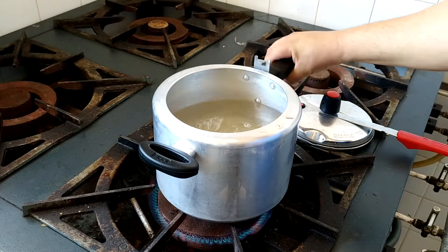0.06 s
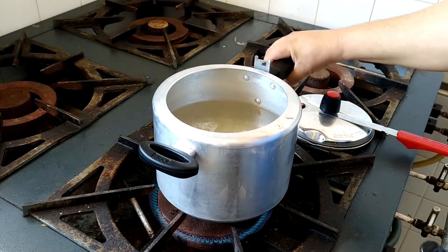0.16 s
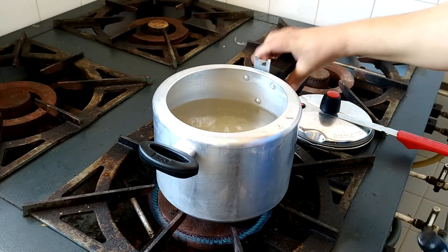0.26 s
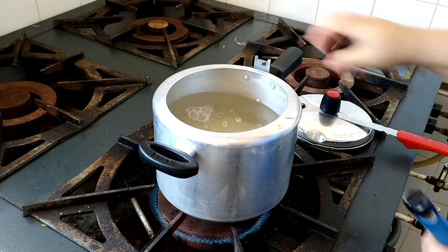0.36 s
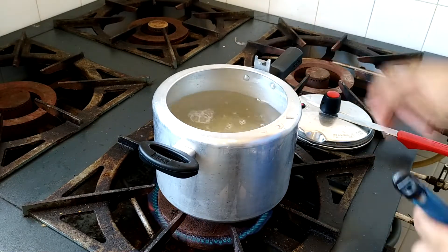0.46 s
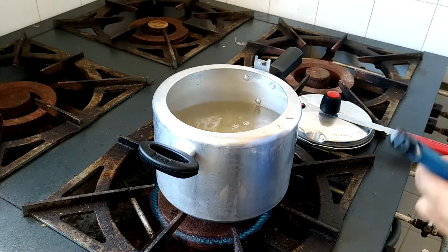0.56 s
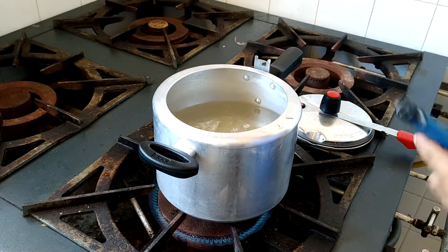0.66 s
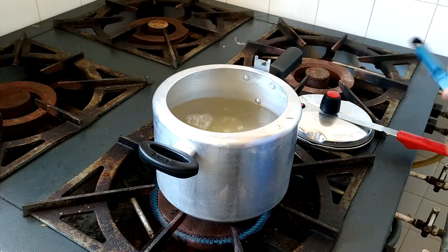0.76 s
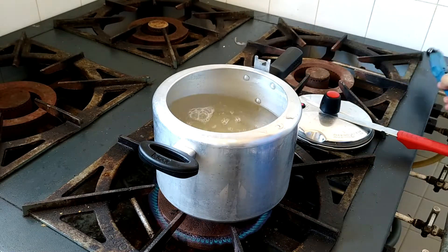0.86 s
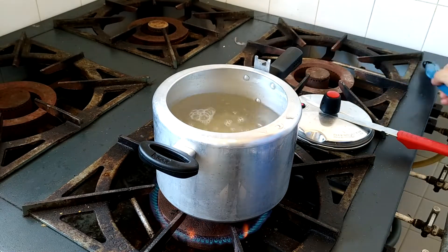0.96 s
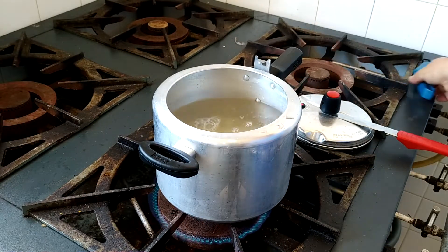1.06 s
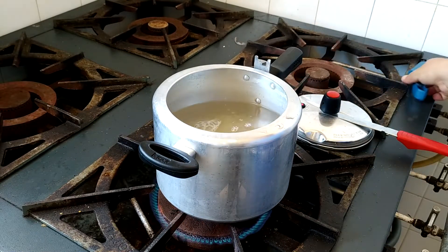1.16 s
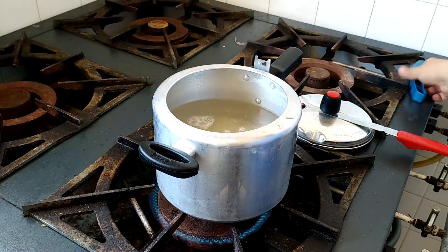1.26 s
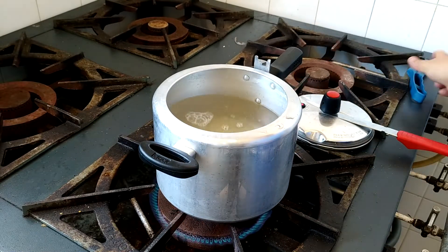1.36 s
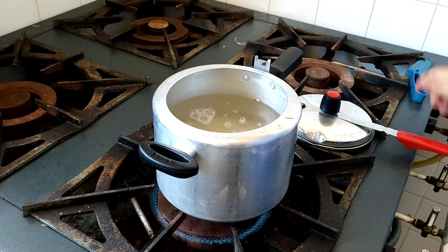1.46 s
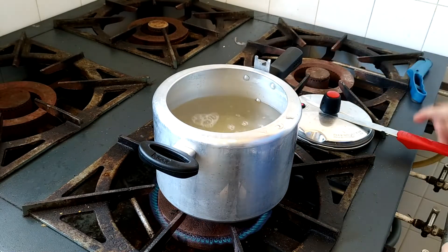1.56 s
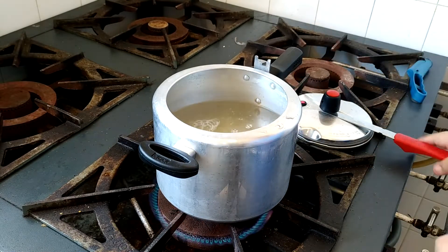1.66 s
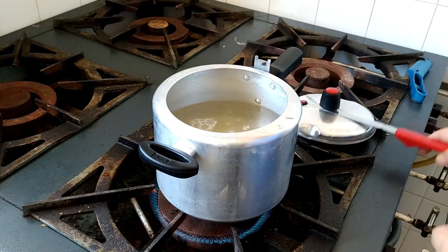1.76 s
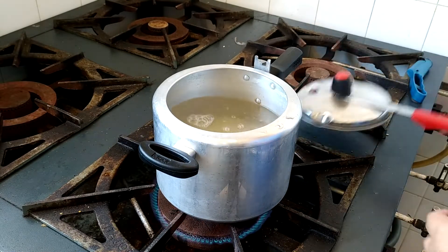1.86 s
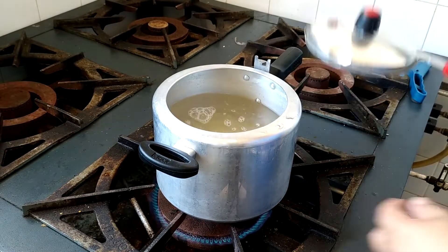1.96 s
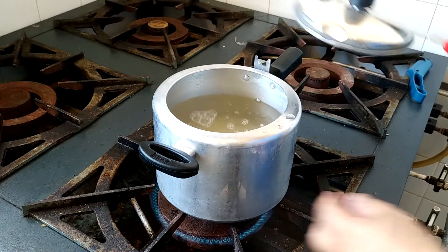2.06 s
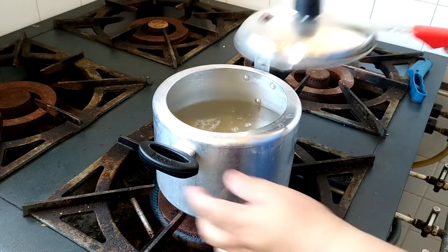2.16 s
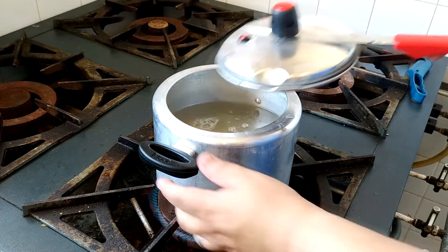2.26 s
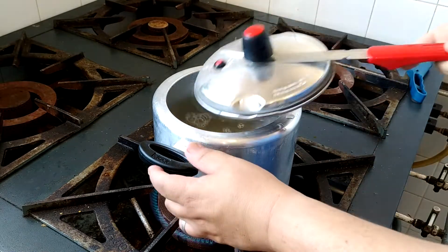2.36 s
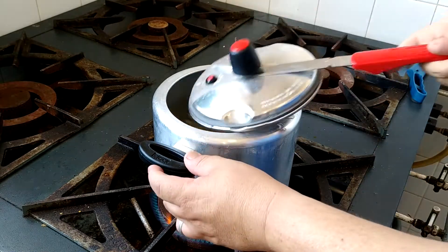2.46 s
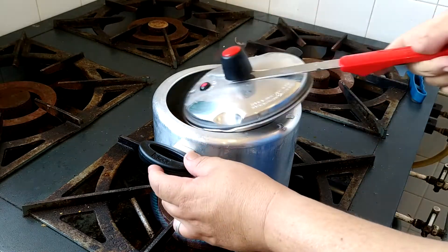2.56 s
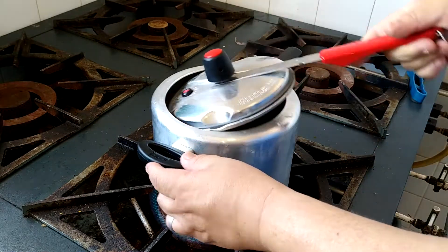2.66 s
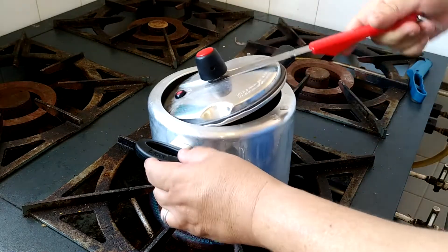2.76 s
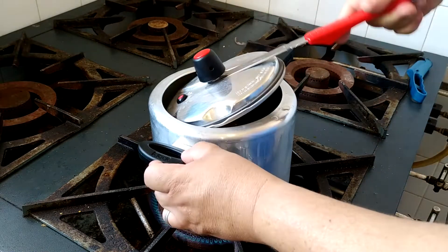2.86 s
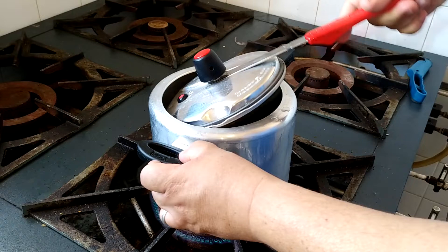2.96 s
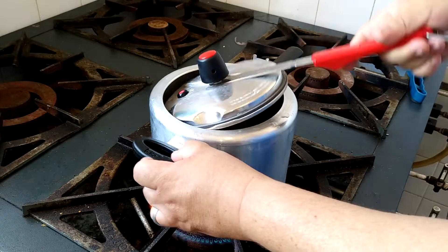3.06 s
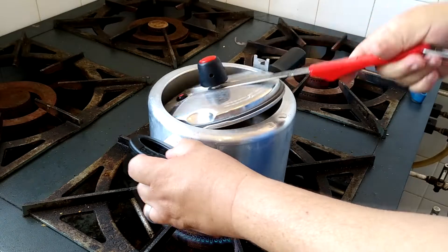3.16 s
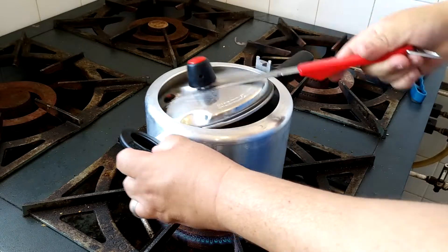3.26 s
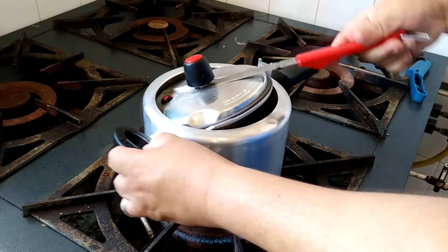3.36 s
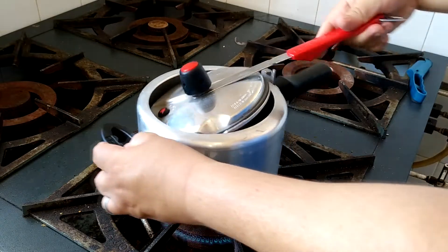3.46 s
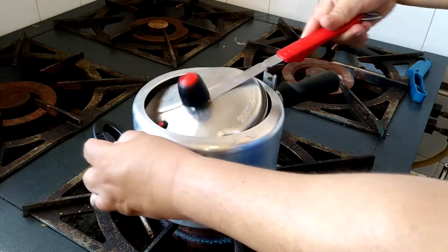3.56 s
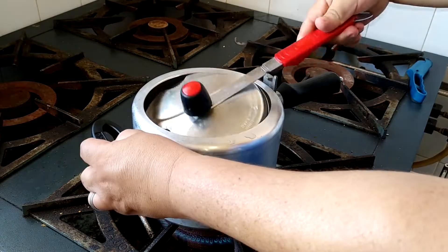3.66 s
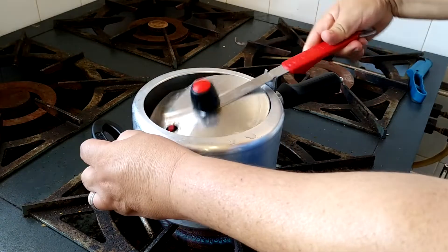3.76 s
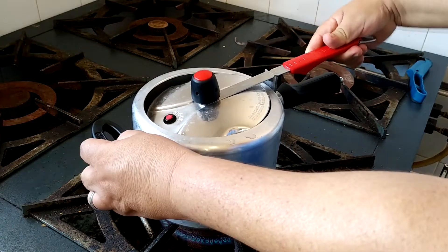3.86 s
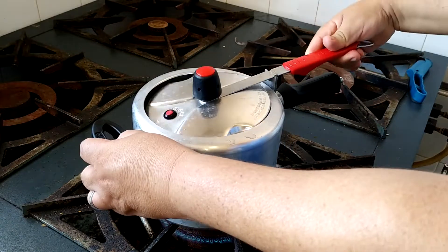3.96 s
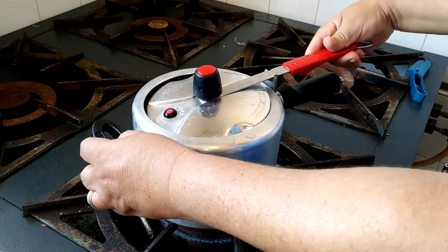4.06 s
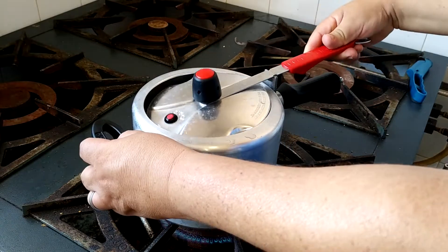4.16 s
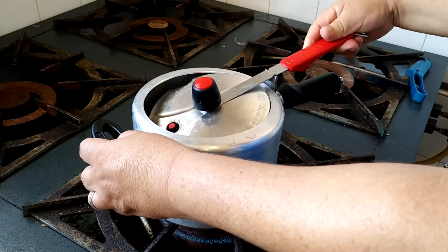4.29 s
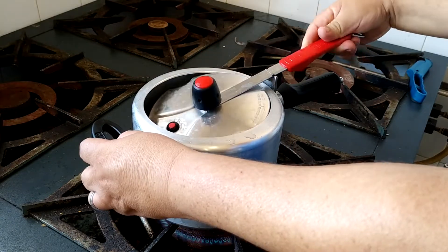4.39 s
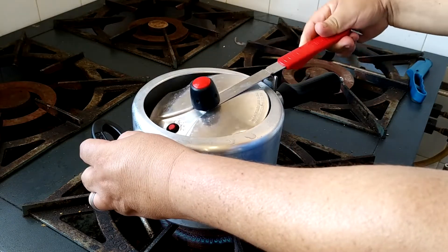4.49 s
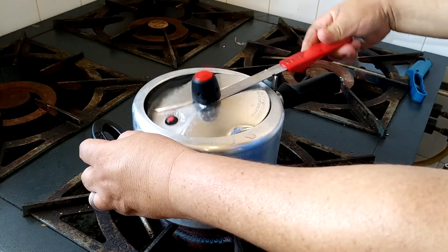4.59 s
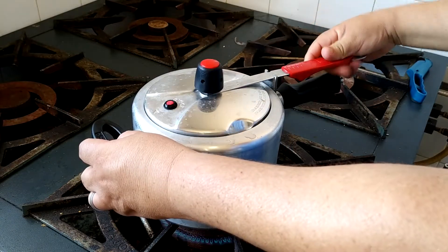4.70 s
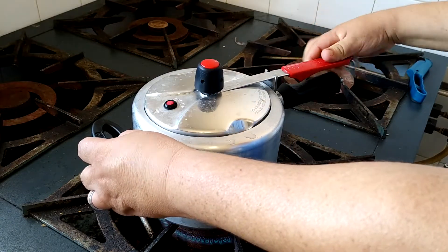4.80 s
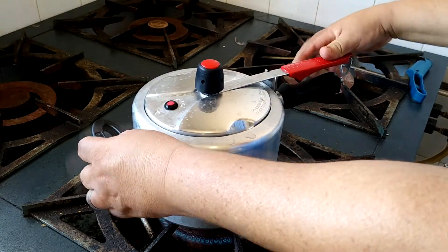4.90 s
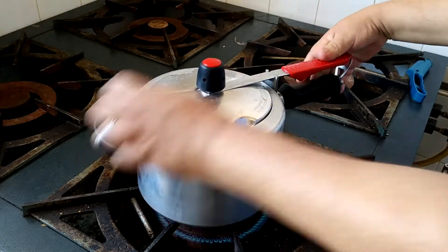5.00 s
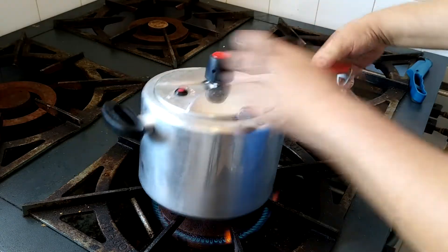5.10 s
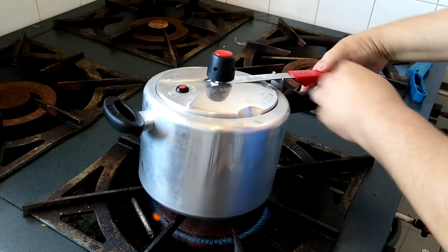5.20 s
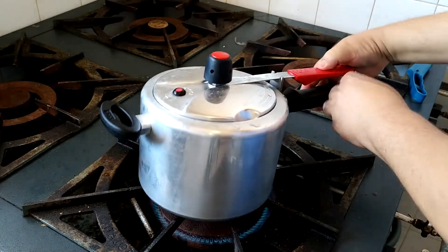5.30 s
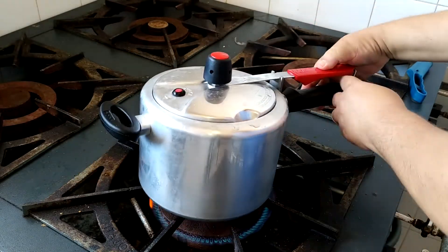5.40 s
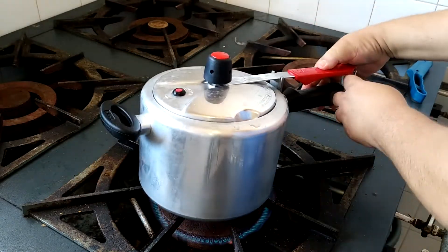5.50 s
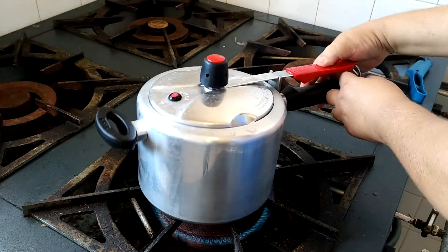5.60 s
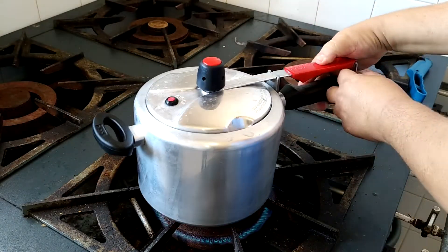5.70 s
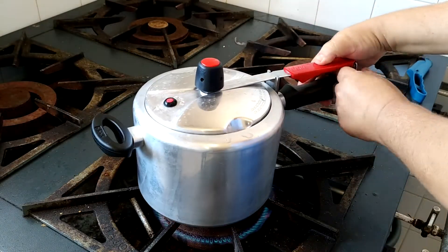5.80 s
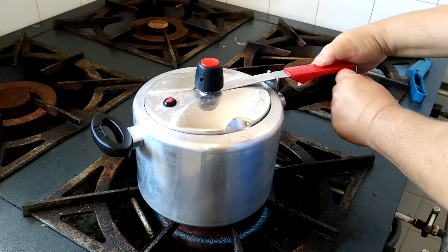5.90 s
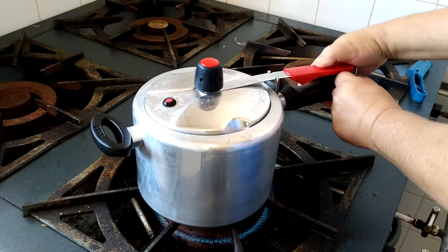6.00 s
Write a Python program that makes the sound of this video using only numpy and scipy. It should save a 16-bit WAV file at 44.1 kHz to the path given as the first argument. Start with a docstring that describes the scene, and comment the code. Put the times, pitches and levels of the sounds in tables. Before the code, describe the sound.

A pressure cooker lid clanks, scrapes and knocks into an aluminium pot over a soft gas roar, then handles thud and a thin clasp ticks.

```python
"""A soft gas roar with a low hum and a faint knock on an iron grate; after a second, louder clanks.
A gas lighter is dropped on the range in a tiled kitchen and the lid of an aluminium pressure cooker is picked up.
The lid knocks and scrapes into the mouth of the pot, whose hollow note sinks as the gap closes; handles thud
and a wire clasp ticks over one of them. Blows are noise bursts and decaying modes, scrapes are trains of tiny
blows, the hollow note is a gliding air resonance, the gas is coloured noise and the hum a wavering sine."""
import sys
import numpy as np
from scipy import signal
from scipy.fft import rfft, irfft, next_fast_len
from scipy.io import wavfile
from scipy.ndimage import uniform_filter1d

SR = 44100
rng = np.random.default_rng(int(sys.argv[2]) if len(sys.argv) > 2 else 0)


def unload_wav(signal):
    """Save mono or channel-first audio to the path in sys.argv[1] as 16-bit WAV at rate SR, clipped to [-1, 1]."""
    wavfile.write(
        sys.argv[1],
        SR,
        np.round(np.clip(np.atleast_2d(signal).T, -1, 1) * 32767).astype(np.int16),
    )


N = 266364
RING_S = np.arange(28224) / SR   # time axis of one blow (s)

# lid blows, first two light ticks as the lid is carried, then knocks against the pot: start_s, level_db (relative),
# treble_db, clunk_db of the pot wall (relative to the knock),
# favoured_hz (note that the point of contact favours)
LID_KNOCKS = [(2.147, -52, 12.5, -11, 1770), (2.306, -51, 11.5, -23, 1266), (2.689, -33.5, 7, 13.5, 710),
              (2.747, -29, 7, 11.5, 1250), (2.772, -31, -1, -5, 1245), (2.866, -37, 6.5, -15, 3990),
              (2.938, -33, 8.5, -22, 2640), (2.989, -39.5, 11.5, -20, 2640), (3.06, -35, 2.5, -6, 710),
              (3.325, -29, -4.5, -6, 1827), (3.483, -34, 9, -9, 4560), (3.522, -25, -2, -10.5, 2670),
              (3.565, -33.5, 3, 4.5, 2650), (3.609, -37, 13.5, 6, 4560), (3.793, -38.5, 9, 8.5, 1030),
              (3.973, -25.5, 2, -23, 2930), (3.992, -26, 8, 5, 850), (4.023, -30.5, -6, -20, 2970),
              (4.819, -30.5, 5, -31, 1870), (4.935, -40, 10.5, 5.5, 1950)]
# strong modes of the lid: pitch_hz, level_db (relative), t60_s
LID_STRONG_MODES = [(707, -18, .45), (1028, -22, .3), (1254, -20, .3), (1481, -23, .25), (1790, -22, .3),
                    (1930, -18, .55), (2605, -19, .3), (2690, -17, .3), (2965, -19, .3), (3900, -24, .2),
                    (4560, -24, .2)]
# crowd of weak modes of the lid: pitch_hz, density_db (per Hz, relative)
LID_SPECTRUM = [(60, 1.5), (140, -6), (300, -5.5), (600, 5.5), (1000, -1), (2300, -1.5), (2800, 0),
                (3400, -5), (6500, -11.5), (9300, -7), (10800, -11), (12000, -30), (16000, -46)]


def lid_knocks():
    """The hand-held lid rings briefly, by its point of contact; square blows also set the pot wall clunking."""
    # pot wall: pitch_hz, level_db (relative), t60_s
    wall_modes = [(576, 0.77, 0.024), (896, 7.7, 0.013), (1229, 6.4, 0.031)]
    out, wall = np.zeros((2, N)), mode_waves(wall_modes)
    for start, db, treble_db, clunk_db, favoured_hz in LID_KNOCKS:
        waves = lid_waves(favoured_hz)
        contact_t60 = 0.0056 * from_db(-0.72 * treble_db)   # a duller blow takes longer to close
        bass_db = 0.4 * min(clunk_db, 0)   # a glancing blow loses bass with its clunk
        body = ragged(LID_SPECTRUM, ripple_db=2.5)
        # the hand lets the lid rebound once
        for s, weaker_db in bounces(start, gap_s=0.023, loss_db=12, count=1):
            knock = clank(body, waves, ring_t60=0.28, crack_db=6, crack_t60=0.019, contact_t60=contact_t60)
            knock = from_db(4.0 + bass_db) * treble(knock, -bass_db, corner_hz=920)   # lifts all but the bass back
            knock = treble(knock, treble_db, corner_hz=2940)
            clunk = from_db(clunk_db) * ring(wall, apart=0.14)
            add(out, s, from_db(db + weaker_db) * (knock + clunk))
    return out


def lid_friction():
    """The lid edge is drawn along the rim in strokes of stick and slip."""
    # strokes: start_s, length_s, level_db (relative)
    strokes = [(2.753, 0.34, -28), (3.27, 0.092, -35.5), (3.499, 0.16, -28), (3.711, 0.064, -30.5),
               (4.89, 0.022, -29.5)]
    return stroke_pressure(strokes) * slips(per_s=110, spread_db=5)


def lid_scrape(friction):
    """Each slip is a tiny blow; the contact wanders round the rim and favours one mode after another."""
    notes_hz = [hz for hz, *_ in LID_STRONG_MODES[4:9]]   # the rim's edge modes
    place = np.floor(2 * wobble(per_s=12)) % len(notes_hz)
    out = 0
    for k, hz in enumerate(notes_hz):
        waves = from_db(12) * lid_waves(hz, ring_share=.4)   # damped by the rim
        body = ragged(LID_SPECTRUM, ripple_db=4)
        response = clank(body, waves, ring_t60=0.1, crack_db=14, crack_t60=0.025)
        response = rms_one(response) / np.sqrt(len(RING_S))   # unit energy
        slips_here = (friction * (place == k))[None]
        out = out + signal.oaconvolve(slips_here, response, axes=1)[:, :N]
    return out


def pot_air(friction, width_hz=17, swell_hz=50, rub_db=-27, knock_push_db=8.5):
    """The air in the pot resonates through the gap round the lid: the narrower the gap, the lower the note."""
    # hollow note, sinking overall as the gap closes: start_s, pitch_hz
    air_note = [(2.65, 511), (2.95, 495.7), (3.1, 539), (3.65, 477.6), (3.966, 487), (3.996, 364),
                (4.111, 396.3), (4.21, 354.7), (4.88, 356.4), (4.905, 230)]
    # the rubber gasket seats and only pushes the air: start_s, push_db (relative)
    gasket_bumps = [(3.649, -13.5), (3.99, -17), (4.085, -23), (4.203, -19.5), (4.846, -16.5), (4.91, -25)]
    # the gasket drags along the rim and keeps the air humming: start_s, length_s, push_db (relative)
    gasket_drags = [(2.75, 0.37, -49), (3.24, 0.1, -54), (3.51, 0.16, -45), (3.7, 0.4, -51.5)]
    push = from_db(rub_db) * friction + stroke_pressure(gasket_drags) * slips(per_s=450, spread_db=0.0)
    covered_s, sealed_s = air_note[0][0], air_note[-1][0]
    knocks = [(s, db + knock_push_db) for s, db, *_ in LID_KNOCKS if covered_s < s < sealed_s]
    for s, push_db in knocks + gasket_bumps:
        push[round(s * SR)] += from_db(push_db)
    hz = in_time(air_note)[0] + 15 * wobble(per_s=50)   # the lid wobbles in the hand
    turn = np.exp(2j * np.pi * np.cumsum(hz) / SR)
    # the rubber softens every push; the resonator works at 0 Hz and is then turned up to the gliding note
    swell = signal.lfilter(*signal.butter(1, swell_hz, fs=SR), push / turn)
    note = (turn * signal.lfilter([1], [1, -np.exp(-np.pi * width_hz / SR)], swell)).imag
    return note * from_db([[-1.5], [-4]])   # leans left


def seat_rubs():
    """The lid shifts lightly on its seat in short, gritty rubs, heavily damped by its gasket; the last rub is a
    handle creaking."""
    # rubs, the last one a creak of the handle: start_s, length_s, level_db (relative)
    rubs = [(4.407, 0.023, -41), (4.42, .36, -57.5), (4.535, 0.03, -43.5), (4.643, 0.014, -40),
            (4.733, 0.008, -36.5), (4.781, 0.02, -39), (5.953, .035, -36.5)]
    # colour of the rubs: pitch_hz, density_db (per Hz, relative)
    rub_spectrum = [(250, -0.5), (520, 12.5), (1000, -7), (1600, 6), (2150, -3.5), (2800, 2), (3400, -6.5),
                    (11000, -36.5)]
    pressure = stroke_pressure(rubs, attack_s=0.0041, release_t60=0.047)
    grit = np.sqrt(np.abs(uniform_filter1d(slips(per_s=550, spread_db=6) ** 2, size=90)))   # 2 ms grains
    return colour(pressure * grit * stereo_noise(N), rub_spectrum)


def handle_thuds(t60=0.14):
    """The plastic handles are pressed together, meet softly and rock the heavy pot."""
    # thuds: start_s, level_db (relative), treble_db
    thuds = [(4.892, -30.5, 14.5), (4.915, -34, -3), (5.376, -28.5, 2.5)]
    # colour of the thuds: pitch_hz, density_db (per Hz, relative)
    thud_spectrum = [(110, -1), (170, 4), (250, 5), (400, -2), (750, -11), (1150, -7), (3000, -17),
                     (12000, -38)]
    out, contact = np.zeros((2, N)), 1 - fade(.035)
    for start, db, treble_db in thuds:
        # the pot rocks back twice
        for s, weaker_db in bounces(start, gap_s=0.02, loss_db=14, count=2):
            thud = stereo_noise(len(RING_S)) * fade(t60) * contact
            add(out, s, from_db(db + weaker_db) * treble(thud, treble_db, corner_hz=680))
    return colour(out, thud_spectrum)


def clasp():
    """The thin steel loop hooked over the handle ticks and pings very high."""
    # ticks: start_s, level_db (relative), treble_db, ping_db (relative to the tick)
    ticks = [(5.043, -34.5, 5, 9), (5.075, -32.5, -2, -4.5), (5.233, -35, -10, 10.5),
             (5.716, -37.5, -19, -10), (5.756, -38, -3.5, -3)]
    # strong modes: pitch_hz, level_db (relative), t60_s
    ping_modes = [(5292, -21, .6), (13105, -7, .4), (14556, -11, .35)]
    # crowd of weak modes: pitch_hz, density_db (per Hz, relative)
    wire_spectrum = [(200, -31), (2100, -10.5), (2750, 8), (3400, -3.5), (7500, 1), (9500, 6.5),
                     (12000, -3), (16000, -32)]
    out, waves = np.zeros((2, N)), mode_waves(ping_modes)
    for s, db, treble_db, ping_db in ticks:
        ping = from_db(ping_db) * chatter(0.6) * waves
        tick = clank(wire_spectrum, ping, ring_t60=0.25, crack_db=7, crack_t60=0.014)
        add(out, s, from_db(db) * treble(tick, treble_db))
    return out * from_db([[1.5], [-1.5]])   # leans left


def grate():
    """Pot, lighter and lid strike the iron grate, which rings together with the steel top under it."""
    # blows: start_s, level_db (relative), treble_db, ring_t60_s, contact_t60_s (closing of the contact)
    blows = [(0.002, -45, -26.5, 0.45, 0.014), (1.131, -26, 8.5, 0.84, 0.0073),
             (1.188, -39.5, 12, 0.51, 0.004), (1.395, -40, -9, 0.55, 0.037), (1.465, -38, -10.5, 1, 0.039),
             (1.82, -50, 9.5, 0.18, 0.038), (1.884, -37.5, 2, 0.54, 0.0021)]
    # strong modes: pitch_hz, level_db (relative), t60_s
    iron_modes = [(520, -11, .45), (600, -12, .5), (830, -9, .65), (945, -11, .35), (998, -11, 1),
                  (1028, -13, .8), (1210, -13, .6), (1435, -7.5, .55), (1592, -9.5, .55), (1800, -13, .45),
                  (1947, -5, .42), (2250, -13, .4), (2412, -13, .3), (2708, -13, .6), (2930, -13, .35),
                  (2972, -10, .42), (7769, -15, .35), (8831, -9, .4), (8980, -13, .35)]
    # crowd of weak modes: pitch_hz, density_db (per Hz, relative)
    iron_spectrum = [(60, -28), (250, -11), (520, -2), (720, -5), (950, 0.5), (2000, -1.5), (3000, -5),
                     (3700, -10.5), (6500, -17.5), (9000, -5.5), (10500, -13.5), (12000, -26), (16000, -65)]
    out, waves = np.zeros((2, N)), np.sqrt(2) * mode_waves(iron_modes)
    body = ragged(iron_spectrum, ripple_db=4)
    for start, db, treble_db, t60, contact_t60 in blows:
        corner_hz = 4000 * from_db(0.82 * min(treble_db, 0))   # a dull blow is dull from lower down
        # each blow rebounds twice, weaker every time
        for s, weaker_db in bounces(start, gap_s=.017, loss_db=11.5, count=2):
            rattling = waves * chatter(0.3)
            blow = clank(body, rattling, t60, crack_db=11.5, crack_t60=0.16, contact_t60=contact_t60)
            add(out, s, from_db(db + weaker_db) * treble(blow, treble_db, corner_hz))
    return out


def burner(hum_hz=54):
    """Gas roar and hiss as coloured noise, over a low hum that wavers in pitch and level."""
    # levels: start_s, flame_db, hum_db
    levels = [(0, -48.5, -50.5), (.45, -50, -59), (1.0, -49, -59), (1.15, -50, -62), (6.04, -48, -73)]
    # gas roar and hiss, with a microphone peak near 9 kHz: pitch_hz, density_db (per Hz, relative)
    flame_spectrum = [(20, 9.5), (58, -15.5), (80, -5), (130, 0), (175, 3.5), (350, -3.5), (700, -10.5),
                      (2000, -18), (4500, -16), (6800, -23), (9300, -7.5), (12000, -26), (16000, -37)]
    flame_db, hum_db = in_time(levels)
    count = N // SR * 20
    waver = np.interp(np.arange(N) / SR * 10, np.arange(count), rng.standard_normal(count))   # 10 steps a second
    hum = np.sqrt(2) * np.sin(2 * np.pi * np.cumsum(hum_hz + 2 * waver) / SR)
    return from_db(flame_db) * colour(stereo_noise(N), flame_spectrum) + from_db(hum_db + 2 * waver) * hum


def kitchen(x, wet_db=-4.0, build_s=0.0026):
    """Reflections from the tiles thicken within milliseconds and die soonest in the treble."""
    # decay of the room: pitch_hz, t60_s
    room_t60 = [(100, 0.8), (2500, 0.53), (6000, 0.48), (10000, 0.28)]
    edges = np.geomspace(60, 18000, 13)
    tail = 0
    for low, high in zip(edges, edges[1:]):
        bandpass = signal.butter(2, [low, high], "band", fs=SR, output="sos")
        band = signal.sosfilt(bandpass, stereo_noise(len(RING_S)))
        tail = tail + band * fade(at_hz(room_t60, np.sqrt(low * high)))
    tail = rms_one(tail * (1 - np.exp(-RING_S / build_s))) / np.sqrt(len(RING_S))   # unit energy
    return x + from_db(wet_db) * signal.fftconvolve(x, tail, axes=1)[:, :N]


def clank(body, waves, ring_t60, crack_db, crack_t60, contact_t60=0.0027, tick_db=0, tick_t60=0.004):
    """One blow: bright tick, short crack, crowd of weak modes, strong modes; all swell as the contact closes."""
    noise = stereo_noise(len(RING_S))
    tick = from_db(tick_db) * noise * fade(tick_t60)
    crowd = noise * (from_db(crack_db) * fade(crack_t60) + fade(ring_t60))
    return (tick + colour(crowd, body) + ring(waves)) * (1 - fade(contact_t60))


def mode_waves(modes):
    """Each mode as a decaying complex oscillation."""
    waves = [from_db(db) * fade(t60) * np.exp(2j * np.pi * hz * RING_S) for hz, db, t60 in modes]
    return np.array(waves, np.complex64)


def lid_waves(favoured_hz, ring_share=1):
    """Where the lid touches decides which of its modes stand out."""
    def lift_db(hz):
        """Up to 10 dB for modes near the favoured note, within about 0.13 octave."""
        return 10 * np.exp(-(np.log2(hz / favoured_hz) / .13) ** 2)
    return mode_waves([(hz, db + lift_db(hz), ring_share * t60) for hz, db, t60 in LID_STRONG_MODES])


def ring(waves, spread_db=2, apart=0.93):
    """Every blow excites the modes anew; they reach the two sides out of step (apart: spread in radians)."""
    size = len(waves)
    phase = rng.uniform(0, 2 * np.pi, size) + apart * rng.standard_normal((2, size))
    strength = from_db(spread_db * rng.standard_normal(size)) * np.exp(1j * phase)
    return (strength.astype(np.complex64) @ waves).real


def ragged(spectrum, ripple_db, spacing_hz=45):
    """Hundreds of uneven modes carve peaks and valleys into a smooth spectrum."""
    hz = np.arange(0, SR / 2, spacing_hz / 2)
    chance = np.interp(hz, hz[::2], rng.standard_normal(len(hz[::2])))
    depth = ripple_db * np.minimum(hz / 2000, 1)   # shallower in the bass
    return np.column_stack([hz + 1, at_hz(spectrum, hz) + depth * np.clip(chance, -2, 2)])


def bounces(s, gap_s, loss_db, count):
    """A blow and its rebounds, at slightly uneven intervals: (s, dB relative to the blow)."""
    gaps = gap_s * rng.uniform(.8, 1.2, count)
    return zip(s + np.append(0, np.cumsum(gaps)), -loss_db * np.arange(count + 1))


def chatter(share):
    """Loose parts rattle, so that their ringing comes unevenly."""
    return 1 + share * wobble(per_s=110)[:len(RING_S)]


def slips(per_s, spread_db):
    """Stick and slip: tiny jolts of uneven size at random moments, scaled to unit power."""
    sizes = from_db(spread_db * np.clip(rng.standard_normal(N), -2, 2)) * rng.choice([-1, 1], N)
    return rms_one(sizes * (rng.random(N) < per_s / SR))


def stroke_pressure(strokes, attack_s=0.0077, release_t60=0.08, ease_db_per_s=18.5):
    """In every stroke the hand bears down quickly, eases off while it lasts and then lets go."""
    t, pressure = np.arange(N) / SR, 0
    for s, length, db in strokes:
        attack = np.clip((t - s) / attack_s, 0, 1)
        ease_db = ease_db_per_s * np.clip(t - s, 0, length)
        release = np.exp(-np.log(1000) * np.maximum(t - s - length, 0) / release_t60)
        pressure = pressure + from_db(db - ease_db) * attack * release
    return pressure


def wobble(per_s):
    """A random waver of about unit size, with per_s steps a second."""
    steps = np.arange(N) / SR * per_s
    return np.interp(steps, np.arange(1000), rng.standard_normal(1000))


def stereo_noise(size):
    """White noise, mostly alike on both sides in the bass and almost unrelated from 1 kHz up."""
    # left-right likeness: pitch_hz, correlation (0 to 1)
    likeness = [(60, 0.78), (200, 0.98), (450, 0.83), (1000, 0.025)]
    alike = np.clip(at_hz(likeness, np.fft.rfftfreq(size, 1 / SR)), -1, 1)
    mid, side = rfft(rng.standard_normal((2, size)))
    return irfft(np.sqrt((1 + alike) / 2) * mid + np.sqrt((1 - alike) / 2) * side * [[1], [-1]], size)


def colour(x, spectrum):
    """Causal (minimum-phase) filter that keeps the power of white noise."""
    size = 2 * next_fast_len(x.shape[-1] // 2 + 1)
    gain = rms_one(from_db(at_hz(spectrum, np.fft.rfftfreq(size, 1 / SR))))
    cepstrum = irfft(np.log(gain))
    # folding the cepstrum forward in time makes the phase minimal
    cepstrum[1:size // 2] *= 2
    cepstrum[size // 2 + 1:] = 0
    return irfft(rfft(x, size) * np.exp(rfft(cepstrum)))[:, :x.shape[-1]]


def treble(x, db, corner_hz=4000):
    """High shelf: a hard contact is bright, a soft one dull."""
    low = signal.lfilter(*signal.butter(1, corner_hz, fs=SR), x)
    return low + from_db(db) * (x - low)


def fade(t60):
    """Exponential decay over the length of one blow."""
    return np.exp(-np.log(1000) * RING_S / max(t60, 1e-3))


def from_db(db):
    """Decibels to gain."""
    return 10 ** (np.asarray(db) / 20)


def rms_one(x):
    """Scale to unit power."""
    return x / np.sqrt(np.mean(x ** 2) + 1e-20)


def in_time(rows):
    """Each column of a curve at every sample."""
    s, *columns = np.transpose(rows)
    return [np.interp(np.arange(N) / SR, s, c) for c in columns]


def at_hz(points, hz):
    """Read a table on a log-frequency axis."""
    table_hz, values = np.array(points)[:, 0], np.array(points)[:, 1]
    return np.interp(np.log(hz + 1), np.log(table_hz), values)


def add(out, s, sound):
    """Mix a stereo sound in at time s."""
    start = round(s * SR)
    out[:, start:start + sound.shape[1]] += sound[:, :N - start]


def scene():
    """Cooker, clasp and grate in the tiled kitchen, over the burner."""
    friction = lid_friction()
    cooker = lid_knocks() + lid_scrape(friction) + seat_rubs() + handle_thuds() + clasp()
    air = pot_air(friction)
    # the whole hollow note arrives direct; only half of it feeds the reflections, which would make it uneven
    sound = kitchen(cooker + grate() + air / 2) + air / 2
    small_bodies = signal.butter(2, 125, "high", fs=SR, output="sos")   # they radiate little bass
    return signal.sosfilt(small_bodies, sound) + burner()


def record(dry):
    """The microphone signal has its highest peaks rounded and everything above 16 kHz cut."""
    cut = signal.ellip(10, .1, 90, 16000, fs=SR, output="sos")
    return signal.sosfilt(cut, np.tanh(dry))


dry = scene()
out = record(dry)
unload_wav(out)
```